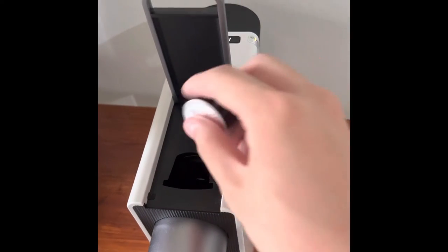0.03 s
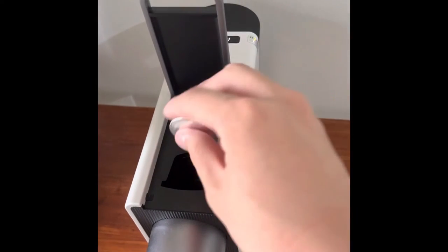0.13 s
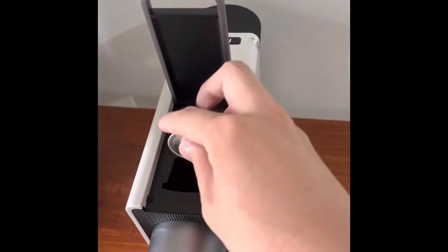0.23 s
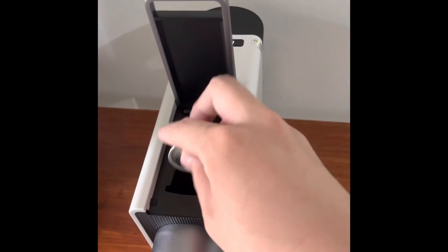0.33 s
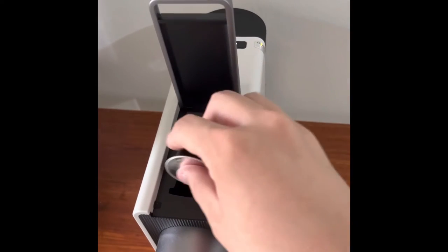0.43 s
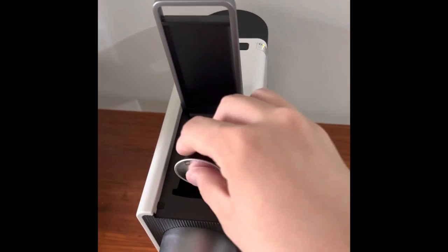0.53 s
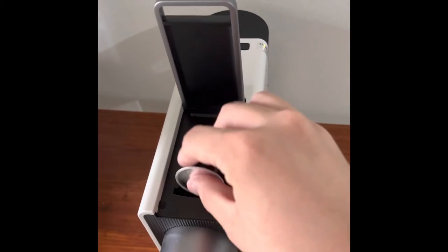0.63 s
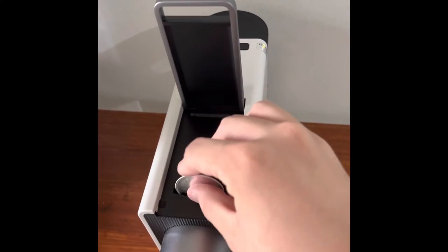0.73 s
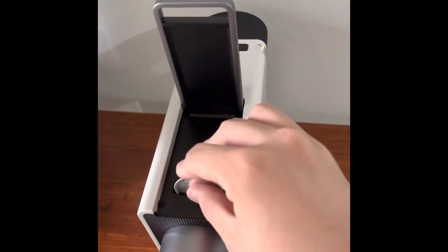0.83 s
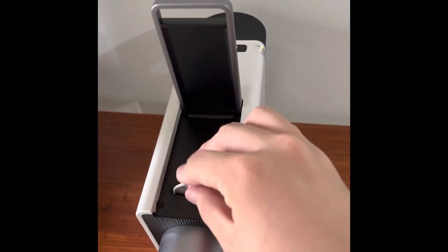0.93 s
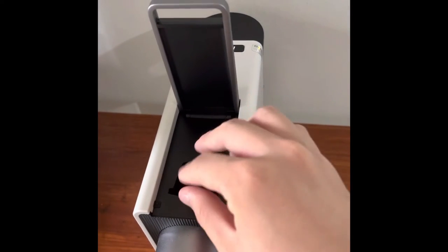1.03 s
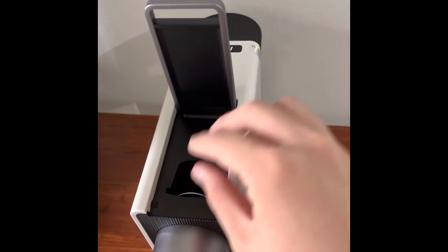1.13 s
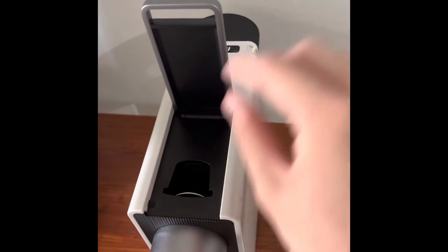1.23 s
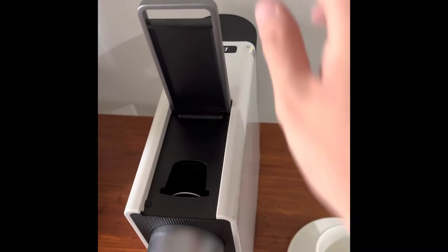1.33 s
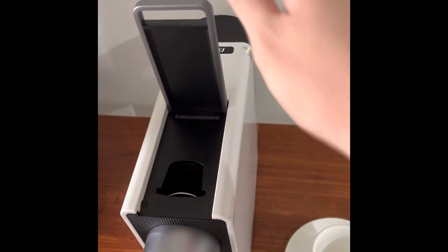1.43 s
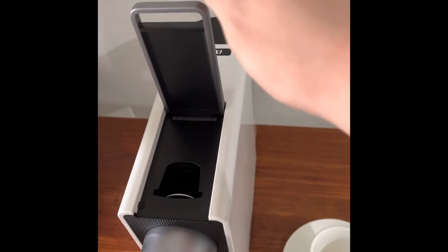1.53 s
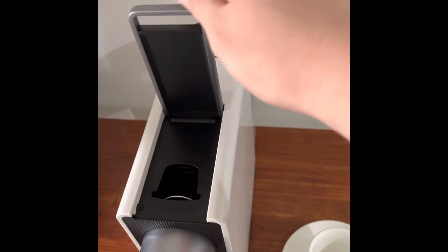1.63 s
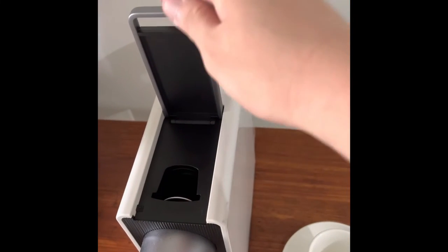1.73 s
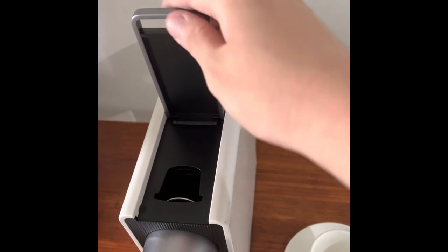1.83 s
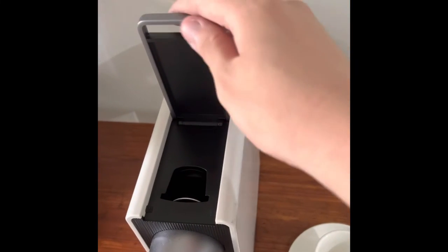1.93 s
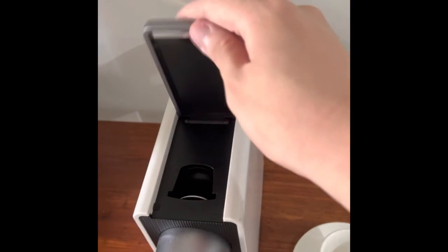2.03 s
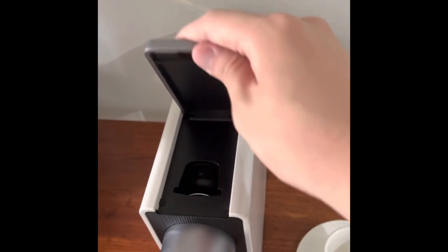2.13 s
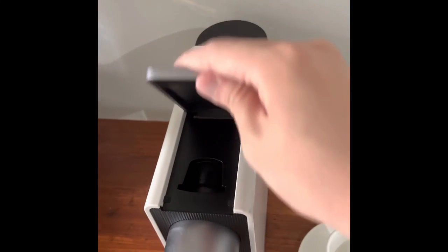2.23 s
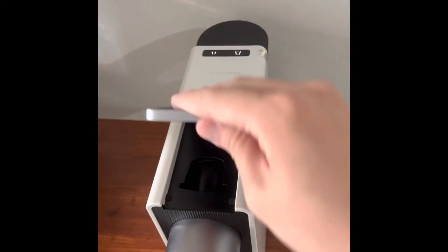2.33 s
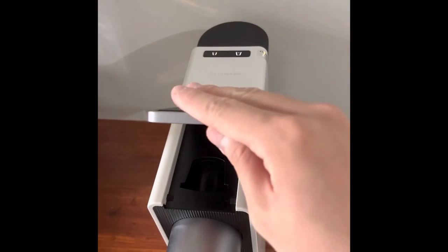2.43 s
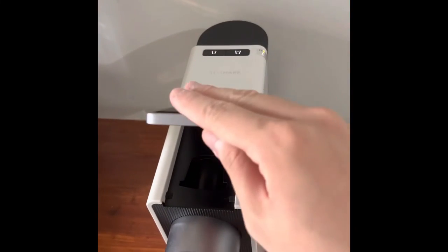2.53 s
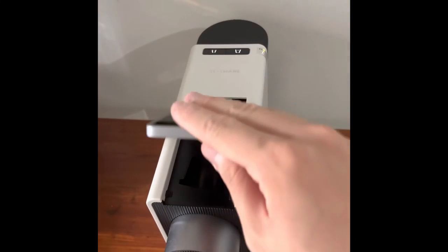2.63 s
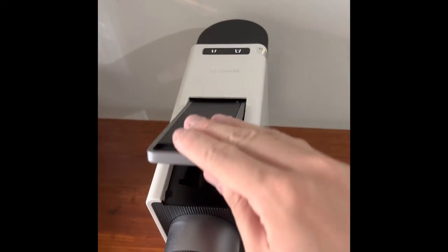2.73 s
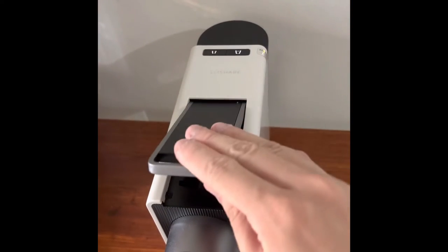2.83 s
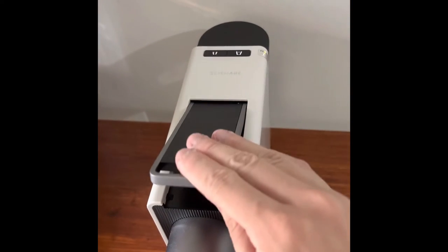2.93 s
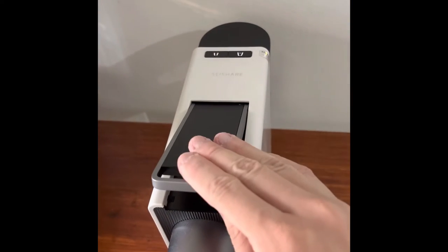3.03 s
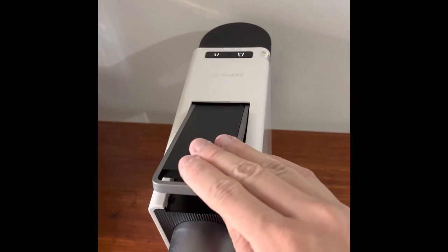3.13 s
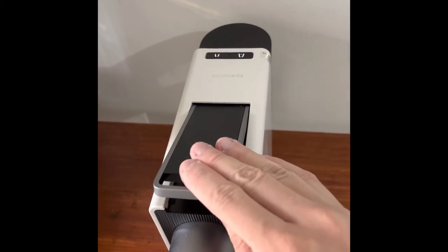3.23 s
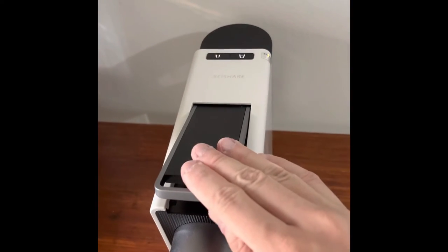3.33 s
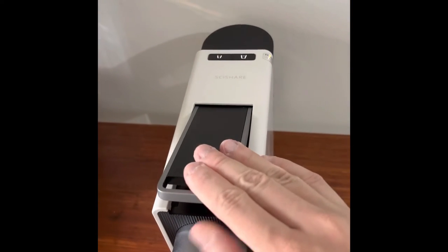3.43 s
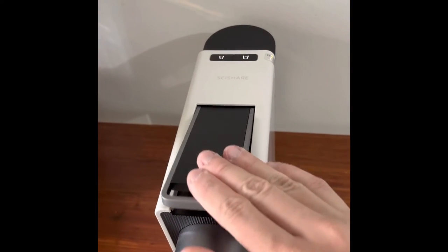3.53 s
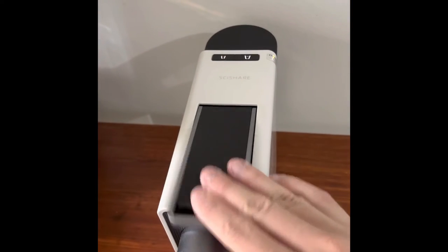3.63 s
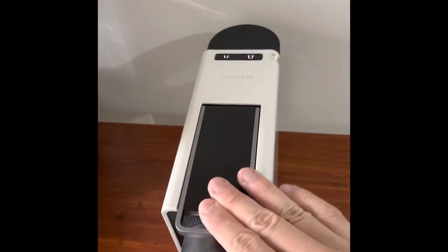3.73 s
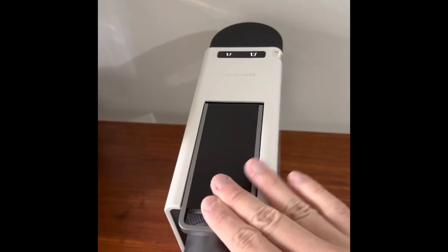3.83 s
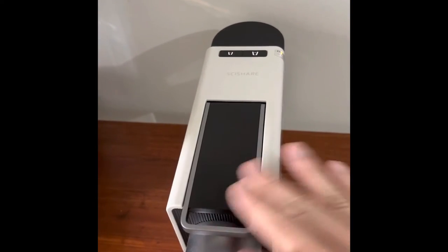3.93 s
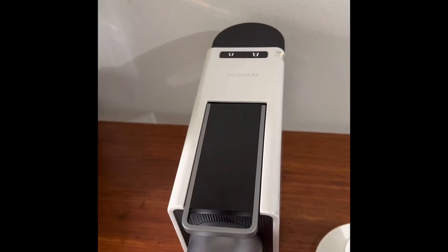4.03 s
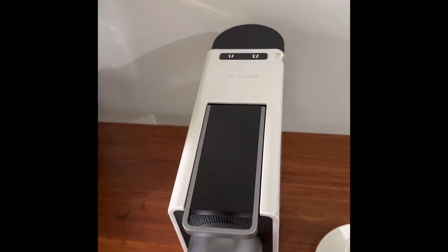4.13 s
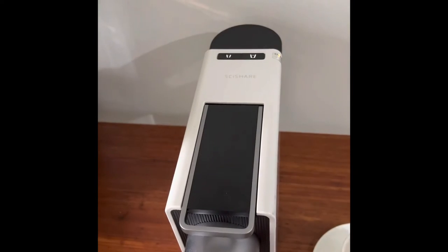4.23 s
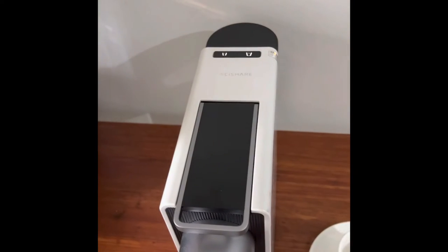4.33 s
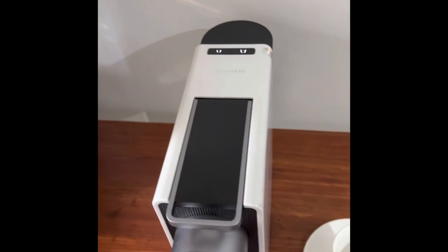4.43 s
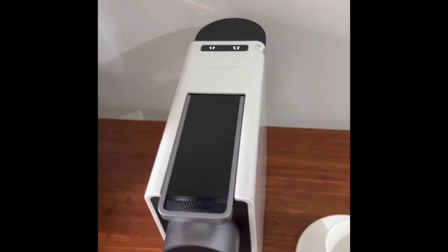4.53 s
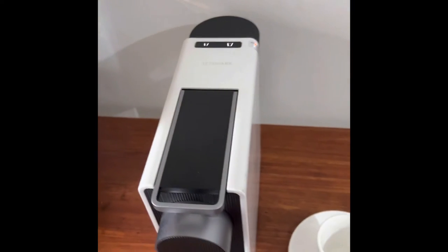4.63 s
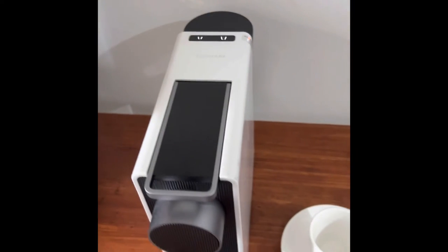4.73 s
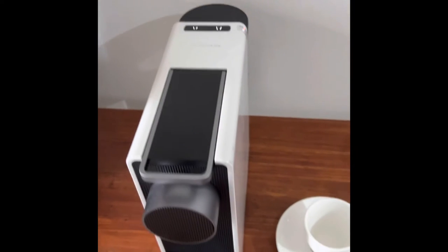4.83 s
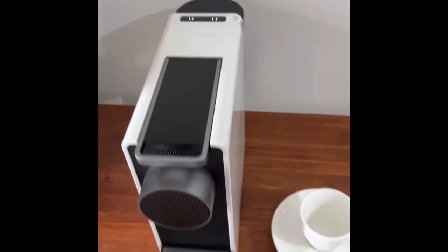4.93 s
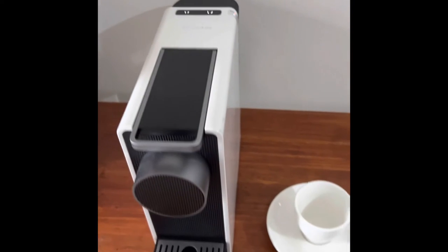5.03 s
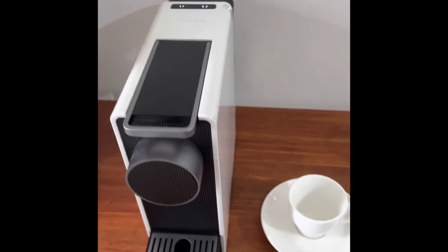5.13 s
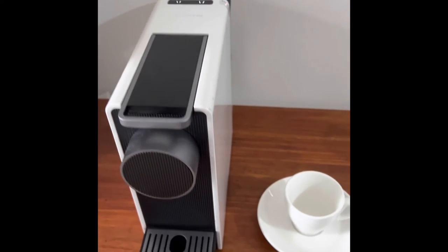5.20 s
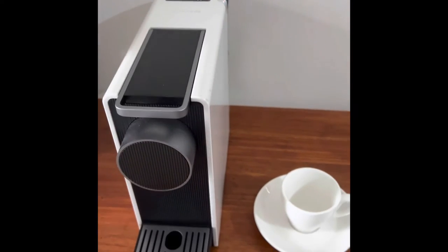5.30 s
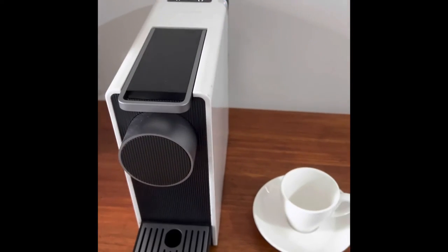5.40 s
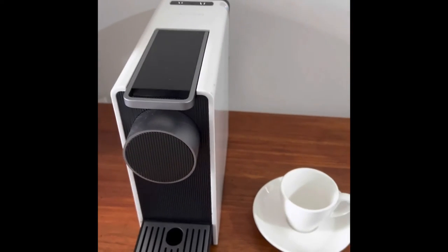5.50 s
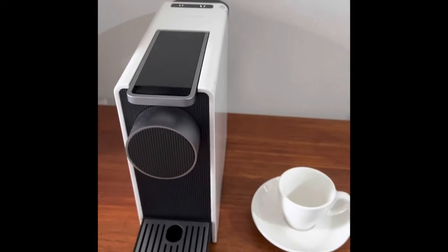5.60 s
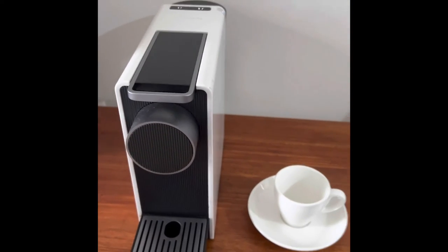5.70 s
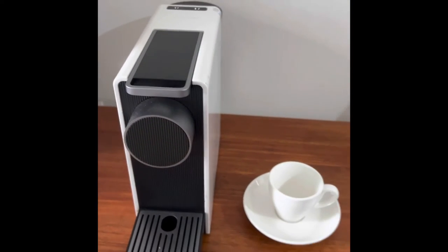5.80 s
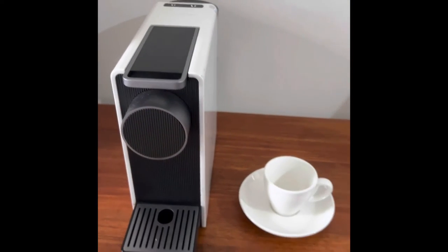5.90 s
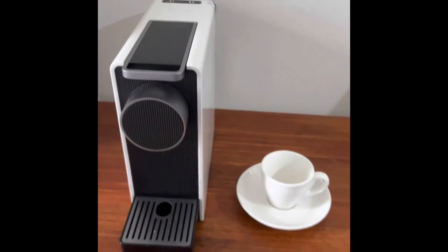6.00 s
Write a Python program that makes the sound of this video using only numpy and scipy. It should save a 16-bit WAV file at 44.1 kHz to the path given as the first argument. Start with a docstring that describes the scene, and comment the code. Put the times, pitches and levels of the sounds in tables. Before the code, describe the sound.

Small hollow plastic knocks come first in two or three little groups, then soft skin rubbing and a busy run of clicks as a lever lid is swung down. A pause, then one far louder bright clack with a short low thump through housing and worktop, trailing muffled rattles. Recorded close, with short room echo, over quiet rumble, faint hum and hiss.

```python
"""A lever lid swings down over its catches on a small plastic coffee machine and is pressed shut with a clack,
close to a handheld phone with two microphone ports: scrapes of force ring the lid, housing and worktop boom.
Before it a hand knocks a capsule into its slot and grips the plastic; after the slam a loose part rattles inside.
The contacts are noise bursts through modes; skin, hinge and a soft rustle are shaped noise.
Behind stands a quiet kitchen of rumble, hum and hiss; decaying noise answers the contacts and blows as its echo."""
import sys
import numpy as np
from scipy import signal
from scipy.fft import rfft, irfft, next_fast_len
from scipy.io import wavfile
from scipy.ndimage import uniform_filter1d, map_coordinates

SR = 44100
rng = np.random.default_rng(int(sys.argv[2]) if len(sys.argv) > 2 else 0)


def generate_wav(signal):
    """Clip the signal to [-1, 1] and save it as 16-bit WAV at the path in sys.argv[1]."""
    frames = np.transpose(np.atleast_2d(signal))
    scaled = np.clip(frames, -1, 1) * 32767
    pcm = np.round(scaled).astype(np.int16)
    wavfile.write(sys.argv[1], SR, pcm)


N = 267290

# Kitchen air. Each row: time in seconds, rumble level in dB, hiss level in dB.
AIR_LEVELS = [(0, -42.5, -57), (.5, -43, -57), (1.3, -42.5, -58.5), (2.2, -42, -55), (3.2, -44, -58.5),
              (4.2, -41, -57), (4.5, -42, -58.5), (4.8, -43.5, -58.5), (5.4, -42, -58.5),
              (6.06, -44.5, -58.5)]
# Building rumble spectrum. Each row: frequency in Hz, relative level in dB per Hz.
RUMBLE_SPECTRUM = [(15, -74), (25, -34.5), (47, -5.5), (97, -1.5), (134, -6), (195, -10), (216, -18),
                   (288, -16), (365, -29.5), (404, -21.5), (500, -21), (650, -60.5), (1100, -120)]
# Room and microphone hiss spectrum. Each row: frequency in Hz, relative level in dB per Hz.
HISS_SPECTRUM = [(240, -29), (400, -5), (436, -9), (510, -8.5), (633, -8), (730, -11), (796, -8.5),
                 (1120, -17.5), (1300, -17), (1780, -24), (2730, -27), (5200, -41.5), (7130, -29.5),
                 (9500, -43.5), (12300, -39.5), (16000, -68), (22000, -120)]
# Fuzzy appliance tones. Each row: frequency in Hz, width in Hz of a resonance applied twice, level in dB.
HUM_TONES = [(196.3, 8, -57.5), (293.1, 78, -54)]
# Likeness of the air at the two ports. Each row: frequency in Hz, left-right correlation from -1 to 1.
AIR_LIKENESS = [(60, 1.0), (110, 0.99), (200, 1), (380, 0.78), (700, 0.023), (1290, 0.77), (2380, 0.3),
                (4400, 0.31), (8120, 1), (15000, -0.9)]
# Balance of the air between the ports. Each row: frequency in Hz, left minus right in dB.
AIR_BALANCE = [(60, 0), (180, -2.5), (550, -2.5), (1650, 2.5), (4970, -0.5), (15000, 0.5)]
# Decay of the kitchen. Each row: frequency in Hz, time to fall 60 dB in seconds.
KITCHEN_DECAY = [(200, 0.88), (1000, 0.41), (2500, 0.3), (6000, 0.37), (12000, 0.36)]
# Colour of the kitchen's answer. Each row: frequency in Hz, gain in dB.
KITCHEN_COLOUR = [(200, -15), (1000, -11.5), (3000, -6.5), (7000, -7.5), (11000, -4.5), (12200, -44)]
# Close sound, out of step between the ports. Each row: frequency in Hz, side minus mid in dB.
PORT_SIDE = [(60, -29.5), (110, -42), (200, -12), (380, -15), (700, -12.5), (1290, -29.5), (2380, -7.5),
             (4400, -6.5), (8120, -13), (15000, 23)]

# A brief soft rustle. Each row: time in seconds, level in dB.
RUSTLE_LEVELS = [(4.65, -68), (4.746, -50.5), (4.81, -81)]
# Spectrum of the rustle. Each row: frequency in Hz, relative level in dB per Hz.
RUSTLE_SPECTRUM = [(350, -46), (600, -11), (793, -3), (1250, -14.5), (2140, -12.5), (5470, -21),
                   (7000, -17), (12500, -33), (16200, -75), (22000, -120)]
# Skin and parts sliding on the plastic, one list per stroke. Each row: time in seconds, level in dB.
GRIP_STROKES = [
    [(0.365, -64), (0.39, -54), (0.5, -65)],
    [(0.95, -51), (1.12, -57)],
    [(1.82, -62), (1.902, -47), (2.028, -42), (2.114, -45), (2.296, -66), (2.522, -59), (2.678, -50.5),
     (3.05, -62)],
]
# Spectrum of that sliding. Each row: frequency in Hz, relative level in dB per Hz.
SKIN_SPECTRUM = [(250, -28), (400, 21), (900, 0.5), (2000, -9), (4000, -9.5), (7000, -33.5), (12000, -54),
                 (12400, -97)]
# Hinge turning under load. Each row: time in seconds, level in dB.
HINGE_LEVELS = [(2.92, -58.5), (3.07, -68), (3.55, -68.5), (3.63, -78)]
# Hinge modes. Each row: frequency in Hz, width in Hz, relative level in dB.
HINGE_MODES = [(3730, 340, -0.5), (7270, 500, -0.5), (9150, 572, -0.5), (10890, 1153, -7)]

# Edges of the tick, knock, click and sparkle bands. Each row: low edge in Hz, high edge in Hz.
CONTACT_BANDS = [(4300, 9300), (450, 1450), (1350, 4600), (8800, 13000)]
# How long tick, knock, click and sparkle last, in one row: shares of the contact time.
BAND_LASTS = [0.67, 1.6, 0.95, 0.34]
# Capsule against the slot. Each row: start in seconds, knock drive in dB, hardness in dB (tick over knock),
# favoured low frequency in Hz, favoured high frequency in Hz.
CAPSULE_CONTACTS = [(0.3686, -42, -8, 1640, 5200), (0.3849, -28.5, -12.5, 1100, 5160),
                    (0.4354, -39, -42, 1040, 5600), (0.614, -51, -22, 1620, 5600),
                    (0.634, -32, -32, 1030, 6100), (0.6682, -31, -17.5, 1050, 7000),
                    (0.6913, -49.5, 7, 710, 10000), (0.7516, -70, 12, 1100, 6960),
                    (0.9547, -62, 11, 1620, 8890), (0.974, -41, 7, 1090, 6000),
                    (0.9801, -43.5, 15.5, 1620, 5600), (1.0128, -51.5, 26.5, 705, 7340),
                    (1.0175, -50.5, 23, 1600, 6600), (1.0238, -31.5, -42, 650, 7130)]
# Capsule modes. Each row: frequency in Hz, width in Hz, relative level in dB.
CAPSULE_MODES = [(663, 30, -1.5), (1042, 50, 8.5), (1630, 340, -6), (2640, 760, 4.5), (3640, 590, -25),
                 (5470, 410, 2), (7300, 1300, -10), (10950, 1000, 2.5)]
# Loose part deep inside after the slam. Each row: start in seconds, knock drive in dB.
RATTLE_BLOWS = [(3.807, -30.5), (3.842, -35), (3.91, -30), (3.926, -37.5), (3.976, -41), (4.004, -48),
                (4.061, -40.5), (4.084, -54), (4.121, -50)]
# Inner cavity modes. Each row: frequency in Hz, width in Hz, relative level in dB.
CAVITY_MODES = [(723, 150, 18.5), (950, 42, 18), (1260, 650, 5.5), (1620, 140, 12.5), (2040, 420, 6),
                (5760, 4700, -49)]
# Blows passed to the housing. Each row: start in seconds, drive in dB.
HOUSING_BLOWS = [(1.029, -35), (1.857, -36.5), (2.001, -31.5), (2.063, -29.5), (2.238, -32), (2.362, -35),
                 (2.463, -34), (2.702, -31), (2.901, -27.5), (3.667, -8), (3.932, -29.5)]
# Housing and worktop modes. Each row: frequency in Hz, relative level in dB,
# time to fall 60 dB in seconds before the hand's damping.
HOUSING_MODES = [(75, -12, .08), (113.4, -13.5, .5), (135.5, -3.5, 0.75), (146, -10.5, .4),
                 (183.2, -17, 0.3), (224, -16, 0.25), (260.6, -8.5, 0.24), (304.6, -15, 0.37),
                 (370.4, -17, 0.41), (431, -21.5, 0.11), (505, -20, 0.2), (578, -25, 0.14),
                 (681, -17.5, 0.17)]
# Small hard catch snapping over and bouncing. Each row: start in seconds, tick drive in dB.
CATCH_SNAPS = [(2.2301, -18.5), (2.2387, -27)]
# Modes of the small catch. Each row: frequency in Hz, width in Hz, relative level in dB.
CATCH_MODES = [(5490, 330, 0), (6120, 600, -2)]
# Fingers, catches and linkage of the lid. Each row: start in seconds, knock drive in dB,
# hardness in dB (tick over knock), favoured low frequency in Hz, favoured high frequency in Hz.
LID_CONTACTS = [(1.8467, -34.5, -12, 850, 4360), (1.8544, -36.5, -6, 686, 5600),
                (1.8721, -30, -4, 2250, 6600), (1.8996, -41.5, -3, 2230, 6600),
                (1.932, -33.5, -7, 1105, 4370), (1.953, -30.5, -4, 690, 5520),
                (1.9674, -30.5, -21, 2100, 6100), (1.9835, -37.5, -23, 690, 3600),
                (1.9964, -30, -1.5, 670, 3600), (2.0084, -31.5, -19, 2250, 3600),
                (2.0433, -34.5, -1, 1410, 6020), (2.0632, -22.5, -5.5, 773, 6000),
                (2.1944, -50, -3, 800, 5740), (2.2308, -25.5, -2, 1430, 9100),
                (2.2384, -26, -8, 1000, 5930), (2.3234, -35.5, -76, 669.5, 5600),
                (2.4623, -33, -3, 2170, 6560), (2.5112, -38, -22, 840, 5650), (2.5794, -45, -18, 780, 3570),
                (2.6074, -49, -12, 825, 3900), (2.6584, -43, -37, 703, 3000), (2.6998, -23, 6, 750, 7070),
                (2.7696, -34.5, -4, 2250, 4130), (2.8494, -54, 5, 1600, 3600),
                (2.8894, -32.5, -23, 690, 7000), (2.9028, -38, 1, 1630, 6580),
                (3.2564, -63, -27, 862, 3600), (3.6544, -28.5, 0.5, 1730, 4530),
                (3.6626, -6.5, -11.5, 1720, 6940), (3.6654, -26, 13.5, 1150, 7240)]
# Lid modes. Each row: frequency in Hz, width in Hz, relative level in dB.
LID_MODES = [(691, 28, -7.5), (898, 93, 10), (1077, 34, -3.5), (1434, 180, 4.5), (1733, 134, -12),
             (2090, 160, 6), (2640, 360, -5.5), (3640, 130.7, -10), (5630, 500, -7), (7200, 2100, 7.5),
             (8640, 1800, -25.5), (11100, 210, -3.5), (12090, 670, -9)]

TOP_HZ = 16500  # band limit of the phone
CLICK_SHARE, SPARKLE_DB = 0.33, -28  # share of hardness reaching the click; sparkle relative to the tick
PAN_SCATTER_DB = 1.2  # left-right scatter from contact to contact
SPOT_DB, SPOT_WIDTH = 9, 0.14  # ring of the spot struck: gain, width over pitch
PING_SHARE = 0.16  # extra high ring of the spot, dB per dB of hardness
ROOM_SPOT = 0.36  # share of the spot's ring that reaches the walls
RATTLE_HARD_DB, RATTLE_HZ = -20.5, (1015, 1250)  # soft blows, always on the same spot
CATCH_HARD_DB, CATCH_HZ = 31, (1393, 5960)  # almost all tick; the spot struck
PALM_DB_PER_S2 = 319  # the hand settling on the lid damps the ring ever more


def amp(db):
    """Gain of a level in dB."""
    return 10 ** (np.asarray(db) / 20)


def unit(x):
    """x at rms 1."""
    return x / np.sqrt(np.mean(x ** 2) + 1e-20)


def along(points, hz):
    """Reads (Hz, value) points on a log frequency axis."""
    f, value = np.transpose(points)
    return np.interp(np.log(hz + 1), np.log(f + 1), value)


def curves(rows, ends=None):
    """One value per sample for each column after the time."""
    s, *columns = np.transpose(rows)
    return [np.interp(np.arange(N) / SR, s, column, ends, ends) for column in columns]


def wobble(rate):
    """A smooth random curve, rate knots a second."""
    knots = rng.standard_normal(int(N * rate / SR) + 4)
    return map_coordinates(knots, [np.arange(N) * rate / SR])


def filtered(x, response):
    """x times a complex response of frequency."""
    n = x.shape[-1]
    m = next_fast_len(n + 4096)
    return irfft(rfft(x, m) * response(np.fft.rfftfreq(m, 1 / SR)), m)[..., :n]


def resonances(modes):
    """Causal response of (Hz, width, dB) modes, of alternating sign."""
    def response(f):
        total = 0
        for k, (hz, width, db) in enumerate(modes):
            loss = 1j * f * width
            total = total + (-1) ** k * amp(db) * loss / (hz * hz - f * f + loss)
        return total
    return response


def add(out, s, sound):
    """Mixes a stereo sound in at time s."""
    at = round(s * SR)
    n = min(sound.shape[1], N - at)
    out[:, at:at + n] += sound[:, :n]


def rush(response, alike, patchy_db):
    """Stereo noise with mid rms 1, in patches of random gain; alike sets the correlation of the ports."""
    z = signal.stft(rng.standard_normal((2, N)), nperseg=512)[2]
    field = rng.standard_normal(z.shape[1:])
    field = uniform_filter1d(uniform_filter1d(field, 6, 0), 10, 1)
    pair = signal.istft(z * amp(patchy_db * unit(field)), nperseg=512)[1][:, :N]

    def mid_side(hz):
        angle = np.arccos(np.clip(along(alike, hz), -1, 1)) / 2
        return response(hz) * np.array([np.cos(angle), np.sin(angle)])
    mid, side = filtered(pair, mid_side)
    return np.array([mid + side, mid - side]) / np.sqrt(np.mean(mid ** 2))


def kitchen_air():
    """Building rumble, fuzzy appliance hum and the hiss of room and microphone, as shaped noise."""
    rumble_db, hiss_db = curves(AIR_LEVELS)
    rumble_gain = amp(rumble_db + 0.48 * wobble(11))
    rumble = rumble_gain * rush(lambda f: amp(along(RUMBLE_SPECTRUM, f)), AIR_LIKENESS, patchy_db=1.5)
    hiss = rush(lambda f: amp(along(HISS_SPECTRUM, f)) * (f < 12400), AIR_LIKENESS, patchy_db=1.84)
    air = rumble + amp(hiss_db) * hiss
    for hz, width, db in HUM_TONES:
        tone = resonances([(hz, width, 0)])
        air = air + amp(db) * rush(lambda f: tone(f) ** 2, [(hz, .95)], patchy_db=3.0)
    return filtered(air, lambda f: amp(np.array([[.5], [-.5]]) * along(AIR_BALANCE, f)))


def echoes(count):
    """Stereo answers of the kitchen, 5 ms late: noise in which each frequency dies at its own speed."""
    size = round(.45 * SR)
    hz, t, z = signal.stft(rng.standard_normal((count, 2, size)), SR, nperseg=256)
    decay = amp(-60 * t / along(KITCHEN_DECAY, hz)[:, None])
    tails = signal.istft(z * decay, SR, nperseg=256)[1][..., :size]
    tails = tails / np.linalg.norm(tails[0, 0])
    tails = filtered(tails, lambda f: amp(along(KITCHEN_COLOUR, f)))
    return np.pad(tails, [(0, 0), (0, 0), (round(.005 * SR), 0)])


def soft_rustle():
    """Something soft rustles once: shaped noise under a short swell."""
    noise = rush(lambda f: amp(along(RUSTLE_SPECTRUM, f)), [(1000, .7)], patchy_db=2.2)
    return amp(curves(RUSTLE_LEVELS, -120)[0]) * noise


def hand_drag():
    """The hand drags unevenly on the plastic: patchy noise under strokes that waver."""
    strokes = sum(amp(curves(rows, -120)[0]) for rows in GRIP_STROKES)
    grip = strokes * unit(amp(2.1 * wobble(70)))
    return grip * rush(lambda f: amp(along(SKIN_SPECTRUM, f)), [(1000, .75)], patchy_db=6.5)


def hinge_rub():
    """The hinge slips unevenly in its bearing: noise through its modes, wavering slowly and fast."""
    noise = rush(lambda f: resonances(HINGE_MODES)(f) * (f < 12300), [(1000, .8)], patchy_db=2.6)
    slips = unit(amp(2.4 * wobble(30) + 2.1 * wobble(250)))
    return amp(curves(HINGE_LEVELS, -120)[0]) * slips * noise


def contacts(table, modes, t60, click_db, pan_db, wet_db, crack_db):
    """Each contact is a short rough scrape of force: a bare crack plus the part's modes; harder ones are brighter."""
    out, lead = np.zeros((2, N)), .003  # lead: seconds of room ahead of the force
    t = np.clip(np.arange(SR // 10) / SR - lead, 0, None)
    low, high = np.transpose(CONTACT_BANDS)[..., None]
    rooms, side = echoes(count=6), np.array([[1], [-1]])
    lasting = t60 * np.array(BAND_LASTS)[:, None]
    envelope = amp(-60 * t / lasting) * (1 - np.exp(-t / (0.015 * lasting)))

    def part(f):
        edges = (1 + (low / (f + 1)) ** 10) * (1 + (f / high) ** 10) * (1 + (f / 13000) ** 40)
        return (resonances(modes)(f) + amp(crack_db)) / np.sqrt(edges)

    for k, (s, knock_db, hard_db, low_hz, high_hz) in enumerate(table):
        force = rng.standard_normal(len(t)) * envelope
        bands = filtered(force, part)
        # tick, knock, click, sparkle
        band_db = knock_db + np.array([hard_db, 0, click_db + CLICK_SHARE * hard_db, hard_db + SPARKLE_DB])
        body = (amp(band_db - 6.5) / np.abs(bands).max(axis=1)) @ bands
        spot = resonances([(low_hz, SPOT_WIDTH * low_hz, SPOT_DB)])
        high_spot = resonances([(high_hz, SPOT_WIDTH * high_hz, SPOT_DB + PING_SHARE * hard_db)])
        ring = filtered(body, lambda f: spot(f) + high_spot(f))
        near = filtered(body + ring, lambda f: 1 + 1j * side * amp(along(PORT_SIDE, f)))
        balance = amp(side * rng.normal(pan_db, PAN_SCATTER_DB) / 2)
        add(out, s - lead, balance * near)
        to_walls = (body + ROOM_SPOT * ring)[None]
        add(out, s - lead, amp(wet_db) * signal.fftconvolve(to_walls, rooms[k % len(rooms)], axes=1))
    return out


def capsule_fitting():
    """The capsule knocks against its slot and rings in its shell modes."""
    return contacts(CAPSULE_CONTACTS, CAPSULE_MODES, t60=0.036, click_db=7.5, pan_db=1.0, wet_db=2.5, crack_db=-6.5)


def loose_rattle():
    """Something loose strikes one spot deep inside with soft blows that ring the cavity."""
    blows = [(s, db, RATTLE_HARD_DB, *RATTLE_HZ) for s, db in RATTLE_BLOWS]
    return contacts(blows, CAVITY_MODES, t60=0.06, click_db=-5.5, pan_db=-1.0, wet_db=9.0, crack_db=-3.5)


def housing_boom():
    """The hollow body and worktop boom under the lid's load; each blow stirs the modes a little differently."""
    out, t = np.zeros((2, N)), np.arange(SR // 2) / SR
    hz, level, t60 = np.transpose(HOUSING_MODES)[..., None]
    fade = amp(level - 60 * t / t60 - PALM_DB_PER_S2 * t ** 2)
    modes = fade * np.sin(2 * np.pi * hz * t) * (1 - np.exp(-t / 0.0041))
    for (s, db), room in zip(HOUSING_BLOWS, echoes(count=len(HOUSING_BLOWS))):
        boom = amp(db + rng.normal(0, 0.4, len(HOUSING_MODES))) @ modes
        # mostly one answer common to both ports
        answer = signal.fftconvolve(boom[None], room[0] + 0.28 * room, axes=1)[:, :len(t)]
        add(out, s, amp([[-.9], [.9]]) * (boom + amp(-2.0) * answer))
    return out


def catch_snap():
    """A small hard catch in the linkage snaps over and bounces, almost all tick."""
    snaps = [(s, db - CATCH_HARD_DB, CATCH_HARD_DB, *CATCH_HZ) for s, db in CATCH_SNAPS]
    return contacts(snaps, CATCH_MODES, t60=0.024, click_db=-5.5, pan_db=1.5, wet_db=-2.5, crack_db=-15)


def lid_closing():
    """Fingers, catches and linkage strike the lid, up to the final clack, and ring its modes."""
    return contacts(LID_CONTACTS, LID_MODES, t60=0.026, click_db=2.5, pan_db=0.3, wet_db=5.5, crack_db=1.5)


def scene():
    """All sources at the two ports: the machine and hand close by, the kitchen behind."""
    machine = capsule_fitting() + lid_closing() + catch_snap() + loose_rattle() + housing_boom()
    rubbing = hinge_rub() + hand_drag() + soft_rustle()
    return machine + rubbing + kitchen_air()


def record(dry):
    """The phone keeps nothing above its band limit."""
    return filtered(dry, lambda hz: hz < TOP_HZ)


dry = scene()
out = record(dry)
generate_wav(out)
```